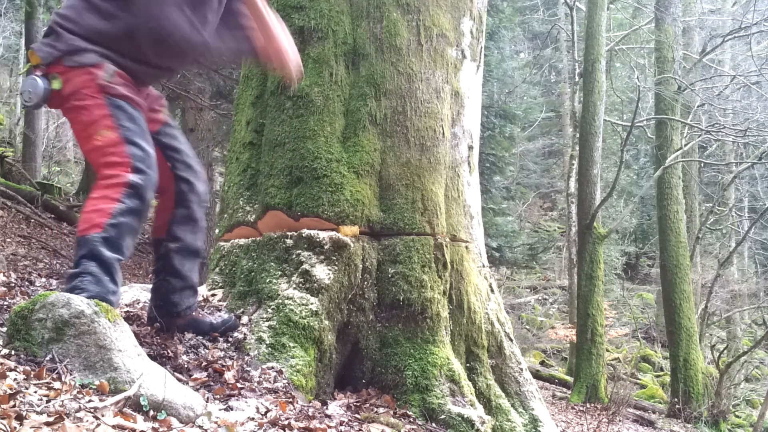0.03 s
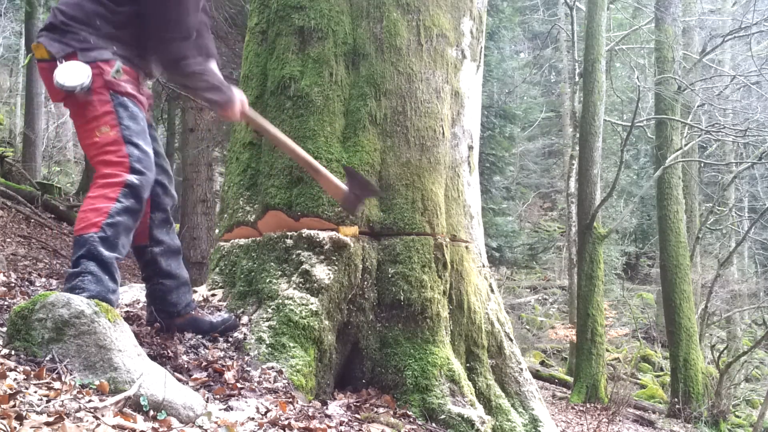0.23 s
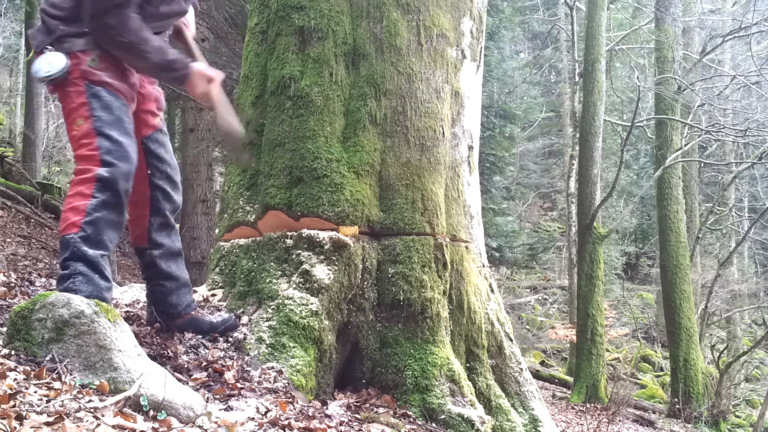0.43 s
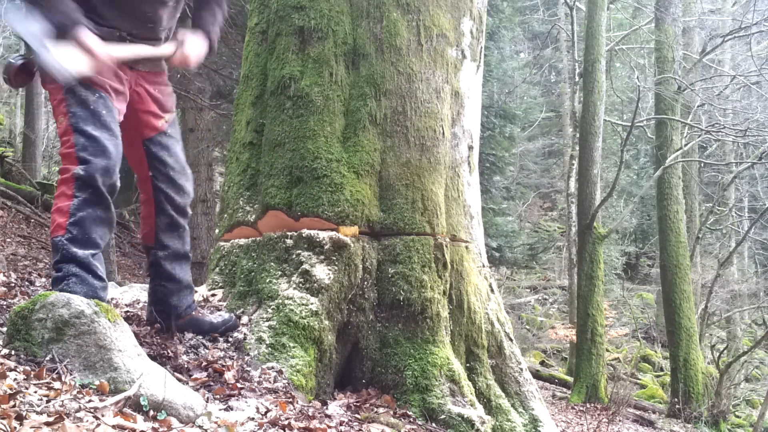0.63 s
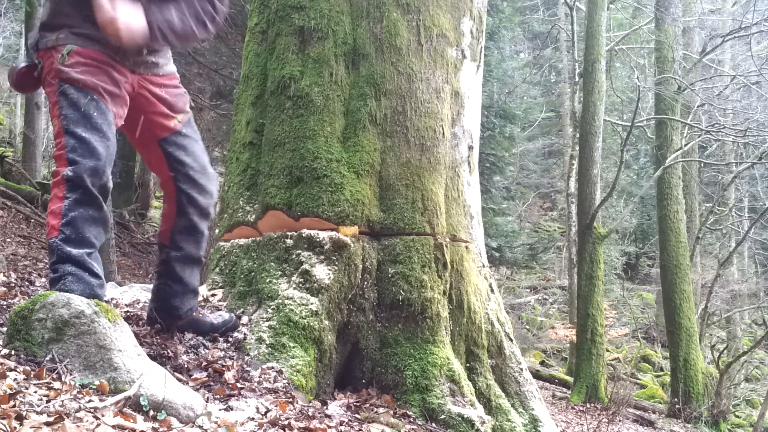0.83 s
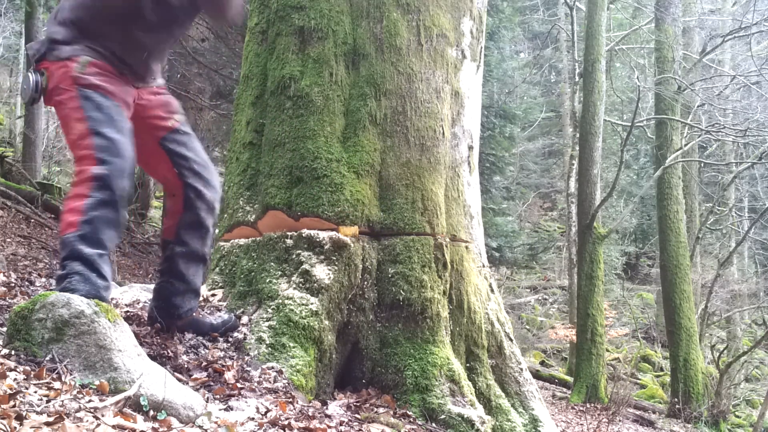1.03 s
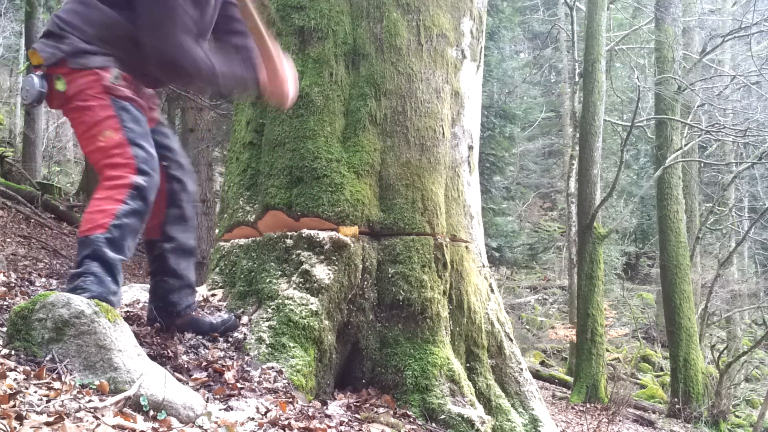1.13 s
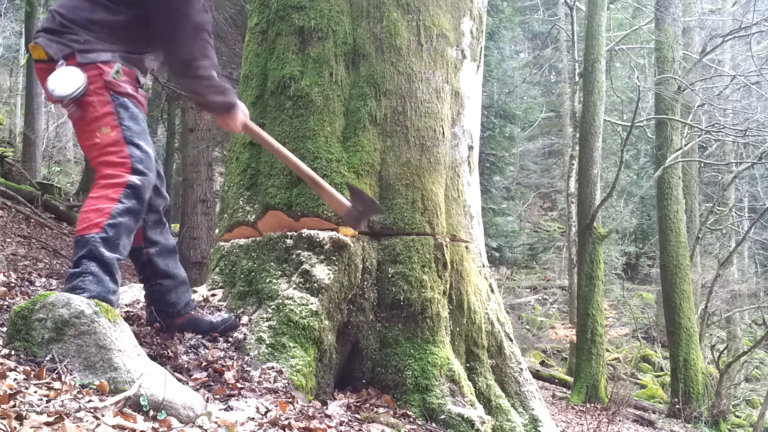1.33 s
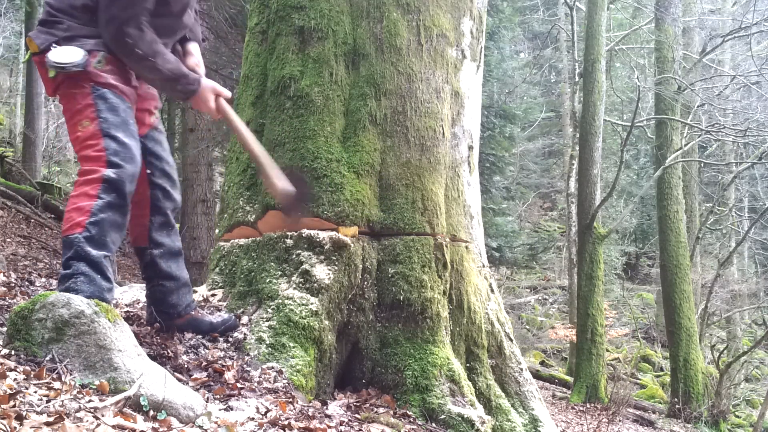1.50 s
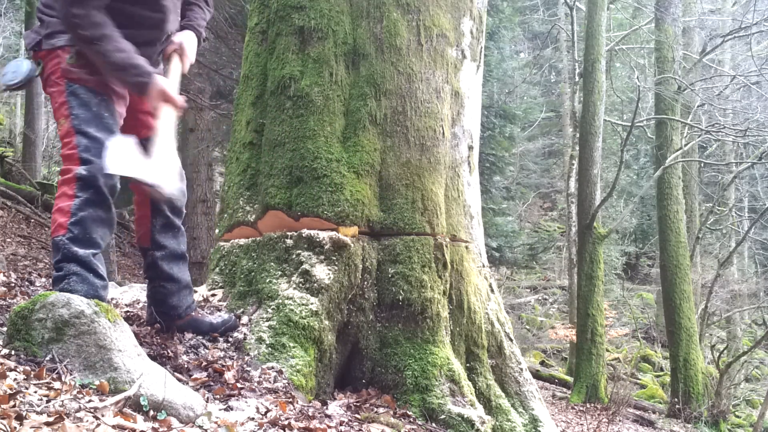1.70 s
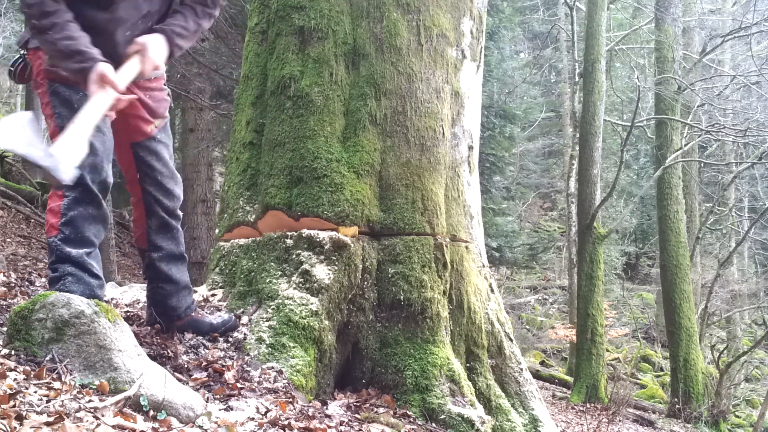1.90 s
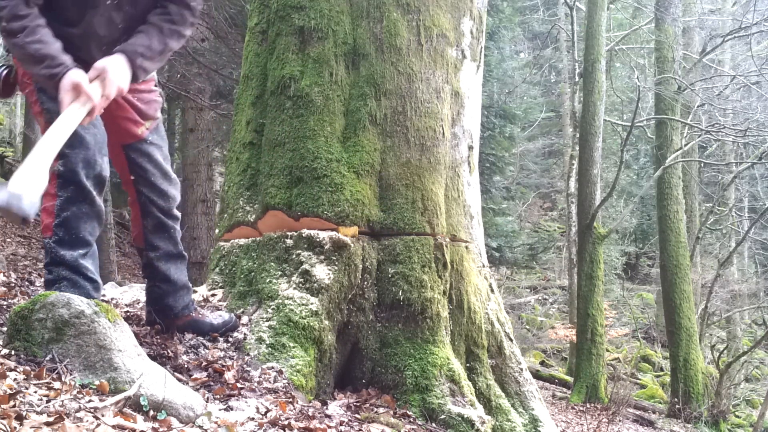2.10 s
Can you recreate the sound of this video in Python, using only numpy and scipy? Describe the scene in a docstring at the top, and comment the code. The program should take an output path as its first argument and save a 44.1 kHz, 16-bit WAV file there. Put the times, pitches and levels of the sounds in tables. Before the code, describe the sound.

An axe hits a felling wedge in a tree trunk twice, about a second apart, so close that the microphone overloads. Each sharp, metallic knock echoes through the quiet forest, with faint leaf ticks underfoot.

```python
"""A small bird whistles in quiet forest air. Then an axe drives a felling wedge into a big tree, so close
that the microphone overloads and thumps: a crack, a short ring of steel, a knock of the trunk and a second
clack, scattered back by the forest. Dry leaves tick underfoot and clothing swishes on the backswing.
The axe lands again, with less steel and more knock, and a few last leaves tick as the echoes die."""
import sys
import numpy as np
from scipy import signal
from scipy.fft import rfft, irfft, next_fast_len
from scipy.io import wavfile

SR = 44100
rng = np.random.default_rng(int(sys.argv[2]) if len(sys.argv) > 2 else 0)


def log_audio(samples):
    """Write samples as a 16-bit WAV file to the path given in sys.argv[1]."""
    # one column per channel
    frames = np.atleast_2d(samples).T
    # limit to full scale, then quantise
    limited = np.clip(frames, -1, 1)
    pcm = np.round(limited * 32767).astype(np.int16)
    wavfile.write(sys.argv[1], SR, pcm)


N = 94815
TIME = np.arange(N) / SR
CUTOFF_HZ = 16000

# The hits: t/s, crack level/dB, crack t60/s, steel level/dB, thump and knock level/dB, clack level/dB,
# forest send/dB, forest tilt/(dB per octave)
BLOWS = [(0.2228, -4, 0.074, -3, -3.5, -6.5, 2.5, 1.5), (1.3329, -3.5, 0.064, -11, -1, -3, 1.5, 1.17)]
# Noise colours of the bright first contact, the crack's body and the hard clack: f/Hz, level/dB
SNAP_EQ = [(200, -1.5), (1200, 0), (2200, 1.5), (5000, 8.5), (7000, 4.5), (10000, -12), (16000, -31)]
CRACK_EQ = [(40, -30), (150, -6), (300, -4), (550, -6), (1000, 0.5), (1700, 3), (2500, -11), (4500, -14),
            (7000, -8), (10000, -19.5), (16000, -18)]
CLACK_EQ = [(200, -18), (900, 0), (1400, -1), (1950, -26), (2250, 11), (2500, 2), (2900, -8), (5500, -18),
            (7300, -5), (8300, -4), (10000, -27), (16000, -30)]
# Ring of axe head and wedge: f/Hz, level/dB, t60/s
STEEL_MODES = [(1405, -1, .09), (1442.5, 10.3, .14), (1692, 2, .06), (2260, -14, .12), (3368, -18, .11),
               (6900, -6, .08), (7387, -3, .135)]
# A short low thump of the overloaded microphone (61 Hz), and the woody knock of the trunk:
# f/Hz, level/dB, t60/s
THUMP_AND_KNOCK = [(61.4, -16.5, 0.051), (116.3, -24.5, 0.32), (165, -20.5, 0.39), (207.3, -12.5, 0.12),
                   (281, -13.5, 0.08), (412.2, -4.5, 0.15), (601, -20.5, 0.17), (702.5, -5, 0.1),
                   (785, -26, 0.057), (885, -12.5, 0.17), (983, -7.5, 0.098), (1101, -8.5, 0.09)]
def axe():
    """Contact cracks, steel rings, the trunk knocks and the microphone thumps; a second clack follows."""
    snap = from_db(8.5) * noise(SNAP_EQ)
    crack = from_db(6) * noise(CRACK_EQ)
    clack = from_db(-7) * noise(CLACK_EQ)
    out = 0
    for start, crack_db, crack_t60, steel_db, thump_knock_db, clack_db, *_ in BLOWS:
        out += from_db(crack_db) * (snap * decay(start, t60=0.022) + crack * decay(start, crack_t60))
        out += from_db(steel_db) * ring(STEEL_MODES, start)
        out += from_db(thump_knock_db) * ring(THUMP_AND_KNOCK, start)
        out += from_db(clack_db) * clack * bump(start + 0.0439, half_width_s=0.0022)
    return out


def ring(tones, start, right_lag_s=0.00014):
    """Decaying sines of alternating sign, set off by one blow and reaching the right microphone later."""
    age = np.maximum(TIME - start - np.array([[0], [right_lag_s]]), 0)
    return sum((-1) ** k * from_db(db) * np.sin(2 * np.pi * hz * age) * np.exp(-np.log(1000) * age / t60)
               for k, (hz, db, t60) in enumerate(tones))


# Slapback from nearby trunks: delay/s, level/dB, pan/dB
SLAPS = [(0.07, -27, 8), (.104, -22, -3)]
# Colour of the slaps: f/Hz, level/dB
SLAP_EQ = [(100, -18), (300, -19), (700, 3), (1050, 11), (1600, -9), (4300, -2), (7200, -5), (9500, -19),
           (16000, -38)]
# Early wash off the slope and near trees, and tail from the deep forest: f/Hz, level/dB, t60/s
NEAR_WASH = [(30, 6.5, 0.24), (80, 5.5, 0.48), (163, 4, 0.34), (415, 14.5, 0.23), (980, -4, 0.64),
             (2380, -0.5, 0.59), (2960, -3.5, .55), (5140, -7, 0.65), (7270, -2, 0.46), (8540, -10.5, 0.41),
             (15300, -15, 0.13)]
FAR_TAIL = [(60, 0, 0.44), (216, -11, 2.42), (440, 0.5, 1.49), (604, -0.5, 1.69), (1060, 3.5, 1.68),
            (1730, -7, 1.8), (2340, -2, 1.36), (3130, -7, 1.246), (6560, -4.5, 0.74), (9030, -20, 1),
            (15000, -41, .6)]
def forest():
    """The trees throw each blow back: soft slaps, a grainy early wash and a long dull tail."""
    slap_envelope = sum(from_db(db) * pan(pan_db) * bump(start + delay, half_width_s=0.006)
                        for start, *_ in BLOWS for delay, db, pan_db in SLAPS)
    slaps = noise(SLAP_EQ) * slap_envelope
    near = from_db(-11.5) * scatter(NEAR_WASH, rise_s=0.0088, grain_db=1.5)
    far = from_db(-23) * scatter(FAR_TAIL, rise_s=0.041, grain_db=0)
    return slaps + near + far


# How the reverb leans across the stereo field: f/Hz, pan/dB
FOREST_PAN = [(60, 6.5), (180, -1), (550, 1), (1650, -0.5), (5000, 3), (15000, 7)]
def scatter(reverb, rise_s, grain_db):
    """Countless small echoes blur into noise; every band dies at its own pace."""
    hz, bins = noise_bins(reverb)
    centres = np.geomspace(40, 15000, 16)
    out = 0
    for centre, share in zip(centres, np.eye(len(centres))):
        crossover = np.interp(np.log(hz), np.log(centres), share)
        band = irfft(bins * crossover)[:, :N] * pan(at_hz(FOREST_PAN, centre))
        octaves = np.log2(centre / 2000)
        t60 = at_hz(reverb, centre, column=2)
        out += band * sum(from_db(db + tilt * octaves) * decay(start, t60)
                          for start, *_, db, tilt in BLOWS)
    return out * from_db(grain_db * drift(700)) * swell(rise_s)


# Tones of trunk and wedge that hang among the trees: f/Hz, level/dB, t60/s
LINGERING_TONES = [(410, -39.5, 1.72), (1045, -28.5, 0.66), (1446, -32.5, 0.87)]
def lingering(flutter_per_s=28):
    """The strongest tones come back by many paths, so they flutter as they die."""
    out = 0
    for hz, db, t60 in LINGERING_TONES:
        phase = 2 * np.pi * hz * TIME
        mid, side = [drift(flutter_per_s) * np.sin(phase) + drift(flutter_per_s) * np.cos(phase)
                     for _ in range(2)]
        envelope = sum(decay(start, t60) for start, *_ in BLOWS)
        out += from_db(db) * stereo(mid, side, hz) * envelope
    return out * swell(rise_s=0.041)


# Ticks underfoot: t/s, level/dB, pan/dB, low-pass f/Hz
LEAF_TICKS = [(.412, -22.5, -4, 11100), (.6095, -33.5, -4, 11000), (0.6898, -23.5, -2, 7860),
              (.7635, -40, -5, 14000), (1.9885, -38, -1, 12000), (2.088, -35.5, -2, 9000),
              (2.13, -27.5, -0.5, 14000)]
# Their crisp colour: f/Hz, level/dB
LEAF_EQ = [(200, -45), (1000, -30), (3500, -14), (5500, 0), (7500, 0), (10000, -7.5), (15000, -2)]
def leaves(rise_s=0.002):
    """Dry leaves and twigs snap under the boots, some duller than others."""
    crackle = noise(LEAF_EQ) * from_db(2.1 * drift(1500))
    out = 0
    for start, db, pan_db, muffle_hz in LEAF_TICKS:
        muffle = signal.butter(2, muffle_hz, fs=SR, output="sos")
        envelope = np.clip((TIME - start) / rise_s, 0, 1) * decay(start, t60=0.026)
        out += from_db(db) * pan(pan_db) * envelope * signal.sosfilt(muffle, crackle)
    return out


# Cloth strokes on the backswing: t/s, level/dB, half width/s
SWISHES = [(1.013, -40.5, 0.02), (1.061, -38, 0.012)]
# Their hissy colour: f/Hz, level/dB
CLOTH_EQ = [(2000, -30), (4300, -17.5), (5600, -2), (7300, -5.5), (10000, -17.5), (15000, -29)]
def clothing():
    """Fabric slides over fabric in soft, slightly rough strokes."""
    strokes = sum(from_db(db) * bump(centre, half_width) for centre, db, half_width in SWISHES)
    return noise(CLOTH_EQ) * strokes * from_db(1.2 * drift(600)) * pan(-2.5)


# The bird's phrase: t/s, length/s, start f/Hz, end f/Hz, start level/dB
WHISTLES = [(-.01, 0.051, 6840, 6910, -37), (0.046, 0.12, 6970, 6910, -45.5),
            (0.122, 0.11, 7570, 7900, -53)]
def bird(waver_hz=55, ramp_s=0.012, fade_db_per_s=109.5):
    """A small bird on the left gives thin, wavering whistles that fade as they go."""
    out = 0
    for start, length, start_hz, end_hz, db in WHISTLES:
        end = start + length
        hz = np.interp(TIME, [start, end], [start_hz, end_hz]) + waver_hz * drift(395)
        gate = np.clip(np.minimum(TIME - start, end - TIME) / ramp_s, 0, 1)
        level_db = db - fade_db_per_s * np.maximum(TIME - start, 0) + 3 * drift(152)
        out += gate * from_db(level_db) * np.sin(2 * np.pi * np.cumsum(hz) / SR)
    return out * pan(7)


# Colour of the ambience bed: f/Hz, level/dB
AIR_EQ = [(15, -47), (25, -11.5), (111, -4.5), (157, -3.5), (270, -5), (354, -13.5), (384, -1.5),
          (1840, -6.5), (2480, -8.5), (2990, -9.5), (6920, -7.5), (8360, -17), (16000, -26.5)]
def air():
    """Quiet forest air is a steady hush under everything."""
    return from_db(-46) * noise(AIR_EQ)


# Stereo width: f/Hz, left-right correlation
CORRELATION = [(40, 0.95), (150, 0.73), (380, 0.9), (650, 0.83), (1000, 0.098), (2400, -0.021),
               (15000, 0.0073)]
def stereo(mid, side, hz):
    """Left and right from two unrelated signals, alike in the bass and apart in the treble."""
    alike = at_hz(CORRELATION, hz)
    return np.sqrt(1 + alike) * mid + np.sqrt(1 - alike) * side * [[1], [-1]]


def noise_bins(eq):
    """Frequencies and spectrum of stereo noise of rms 1; the EQ sets only its colour."""
    size = next_fast_len(N)
    hz = np.maximum(np.arange(size // 2 + 1) * SR / size, 1)
    mid, side = rfft(rng.standard_normal((2, size)))
    gain = from_db(at_hz(eq, hz)) * (hz < CUTOFF_HZ)
    return hz, gain / np.sqrt(np.mean(gain ** 2)) * stereo(mid, side, hz)


def noise(eq):
    """Coloured stereo noise of rms 1."""
    return irfft(noise_bins(eq)[1])[:, :N]


def swell(rise_s):
    """Echo gain that drops to zero at each blow and builds up again."""
    return 1 - sum((TIME >= start) * np.exp(-np.maximum(TIME - start, 0) / rise_s) for start, *_ in BLOWS)


def decay(start, t60):
    """Sudden onset, then a fall of 60 dB every t60 seconds."""
    age = TIME - start
    return (age >= 0) * np.exp(-np.log(1000) * np.maximum(age, 0) / t60)


def bump(centre, half_width_s):
    """A bell-shaped rise and fall."""
    return np.exp(-.5 * ((TIME - centre) / half_width_s) ** 2)


def drift(rate):
    """A glide through `rate` random values a second."""
    return np.interp(TIME * rate, np.arange(N), rng.standard_normal(N))


def at_hz(table, hz, column=1):
    """Read a column of a table on a log-frequency axis."""
    table = np.array(table)
    return np.interp(np.log(hz), np.log(table[:, 0]), table[:, column])


def pan(db):
    """Left and right gains for a level difference; positive is left."""
    return from_db(np.array([[db], [-db]]) / 2)


def from_db(db):
    """Decibels to gain."""
    return 10 ** (np.asarray(db) / 20)


def scene():
    """The blows and their echoes over the small sounds of the forest."""
    return axe() + forest() + lingering() + leaves() + clothing() + bird() + air()


def record(dry):
    """The blows overload the input and are clipped flat; a steep low-pass cuts the top."""
    lowpass = signal.ellip(10, .1, 70, CUTOFF_HZ, fs=SR, output="sos")
    return signal.sosfilt(lowpass, np.clip(dry, -1, 1))


dry = scene()
out = record(dry)
log_audio(out)
```